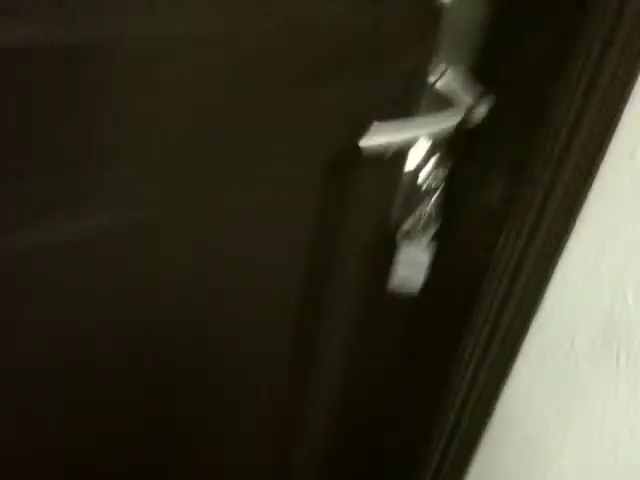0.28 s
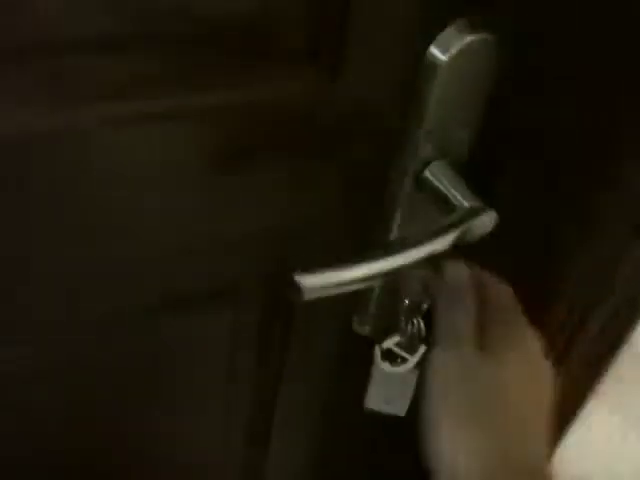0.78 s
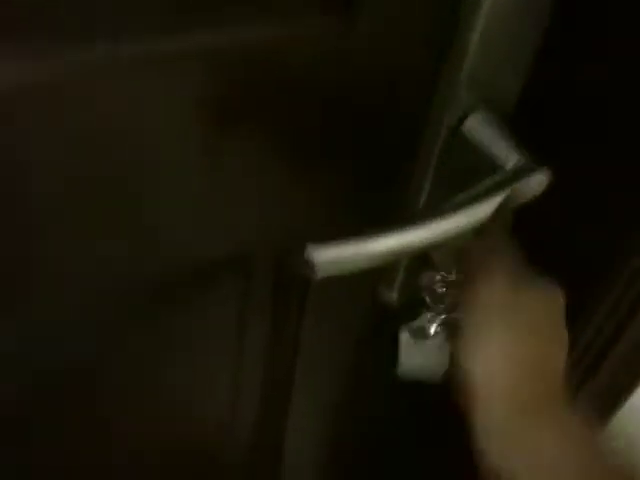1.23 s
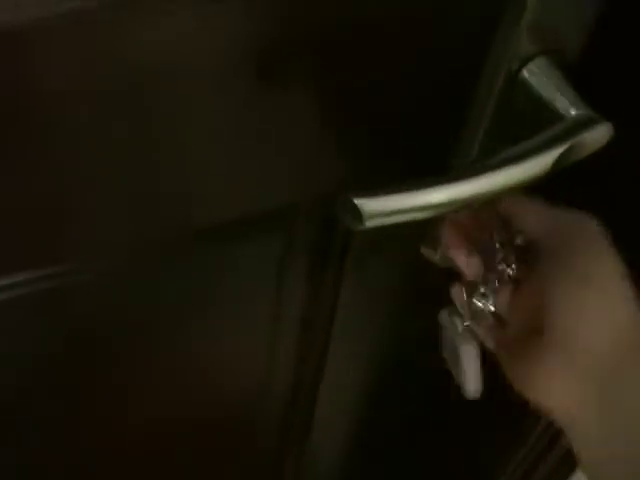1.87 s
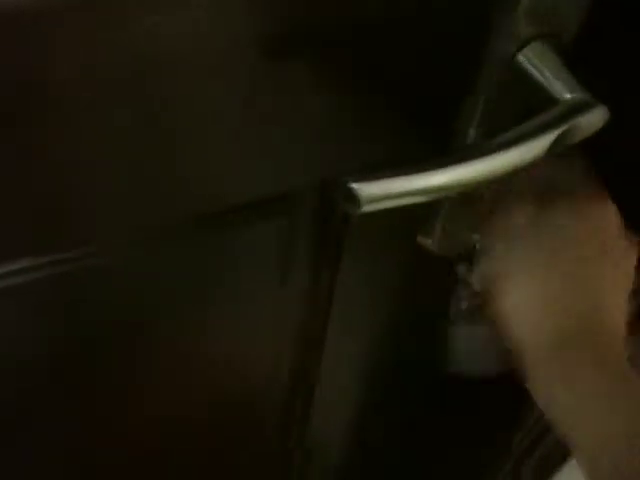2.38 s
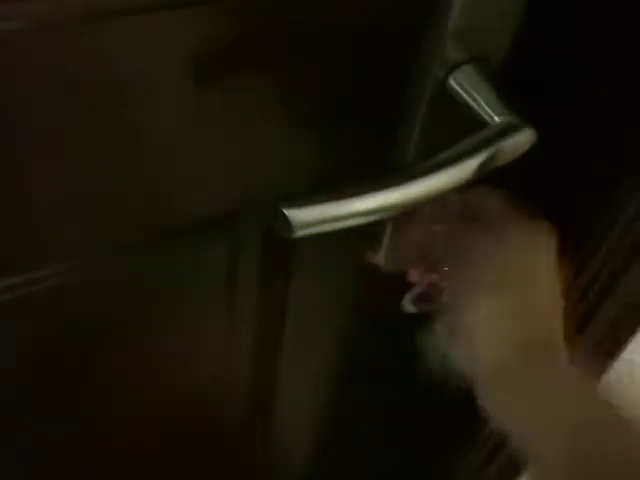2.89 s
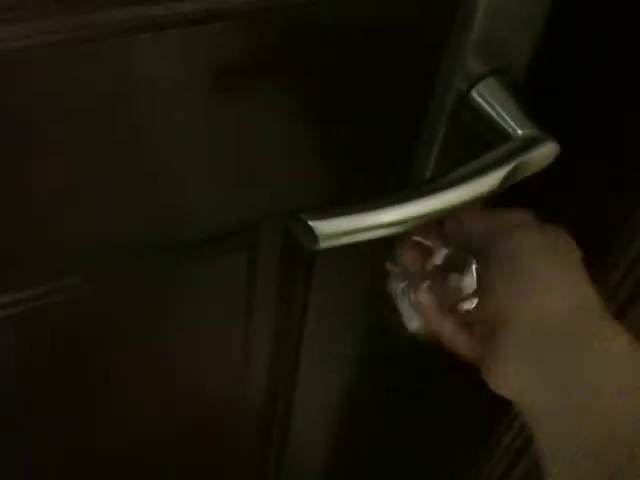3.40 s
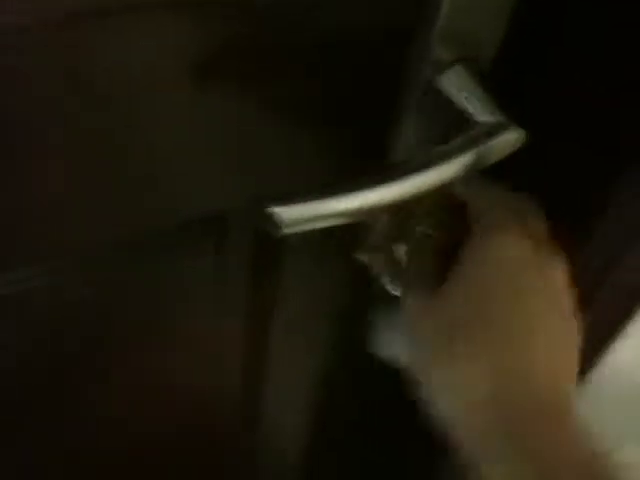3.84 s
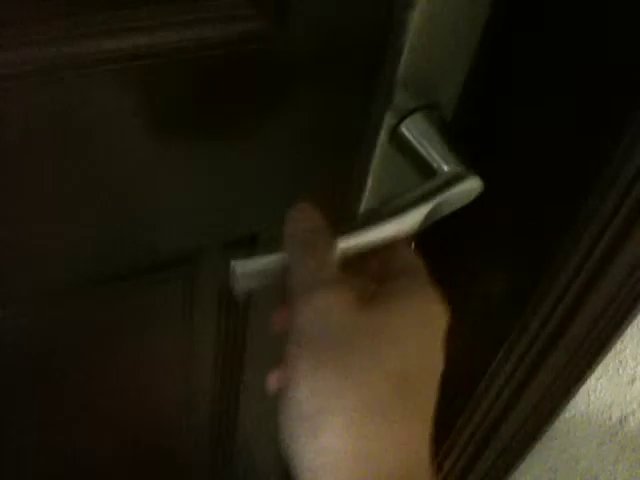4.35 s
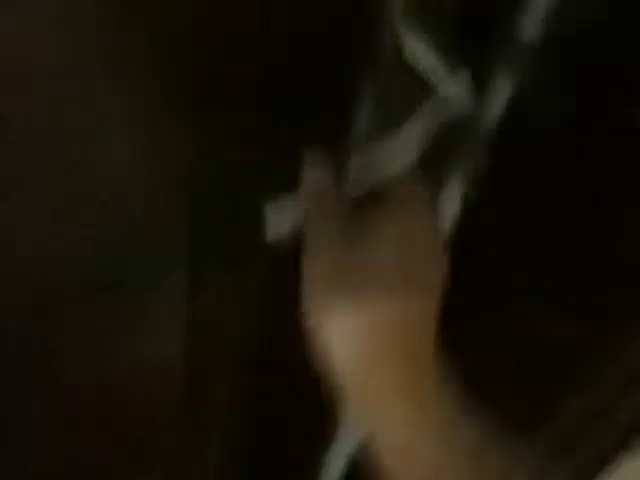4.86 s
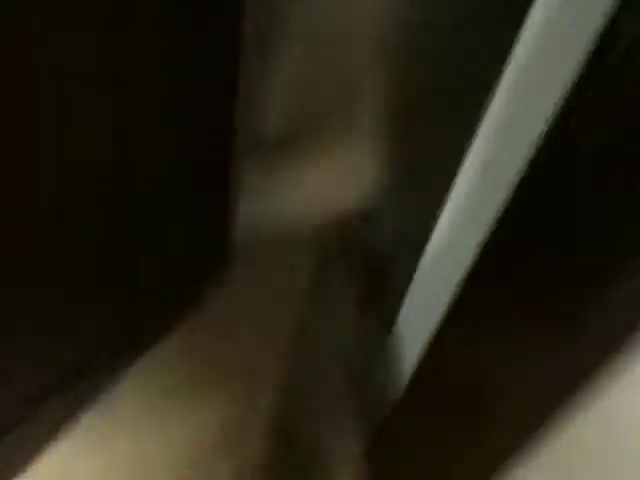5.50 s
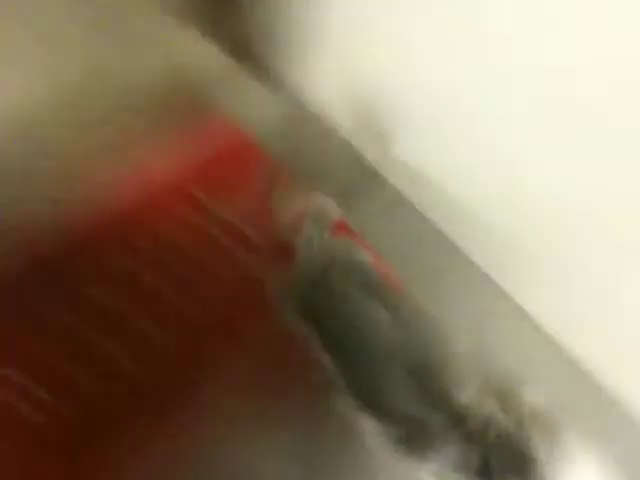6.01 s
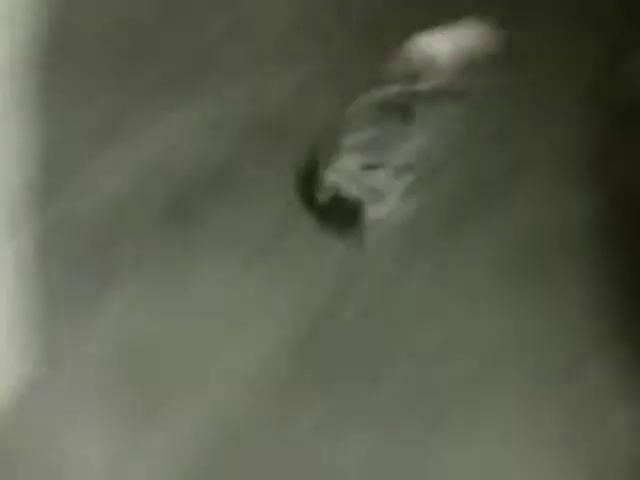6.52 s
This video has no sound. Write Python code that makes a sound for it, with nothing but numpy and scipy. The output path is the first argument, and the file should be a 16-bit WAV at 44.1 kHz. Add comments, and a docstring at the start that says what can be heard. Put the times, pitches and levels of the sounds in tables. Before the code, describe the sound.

Soft steps and a little rustling open the first half second over faint, still room air. Around 1 second a key clicks into a door lock close by, with a dull knock on the wooden door. The key scrapes and ticks, then turns with a loud steel clack at about 2.1 seconds. Small rattles and the tinkle of hanging keys continue until a second turn shoots the bolt back at 3.5 seconds, ringing briefly and thumping through the door. Near 4 seconds the key comes out with a sharp snap and a bright jingle. The lever handle clunks at 4.5 seconds with faint squeaks, and the latch rattles at about 5.2 as the door opens. Light knocks and rustles follow, with soft low bumps on the hand-held microphone just after 6 seconds. The hard walls of a garage ring after each click.

```python
"""Soft steps and a knock, then close by a key turns twice in a door lock, the bolt shoots back, the
lever is pressed and the door opens on a garage. Steel parts snap and rattle in the lock case, the
wooden door carries the blows, the hanging keys tinkle. A hard-walled room rings after each click.
The microphone rides on a hand-held camera, which is bumped as it is carried through."""
import sys
import numpy as np
from scipy import signal
from scipy.fft import rfft, irfft
from scipy.io import wavfile
from scipy.ndimage import uniform_filter1d

SR = 44100
rng = np.random.default_rng(int(sys.argv[2]) if len(sys.argv) > 2 else 0)


def wav_record(signal):
    """Record a signal, one row per channel, as 16-bit PCM in the file named by sys.argv[1]."""
    frames = np.transpose(np.atleast_2d(signal))
    bounded = np.clip(frames, -1, 1)
    # unit amplitude maps onto the largest positive 16-bit level
    quanta = np.round(bounded * 32767).astype(np.int16)
    wavfile.write(sys.argv[1], SR, quanta)


N = 297016
TIME = np.arange(N) / SR
BANDS_HZ, TOP_HZ = 62.5 * 2 ** np.arange(9), 16000

# steel blows: key in from 1 s, turns at 2.1 and 3.5 s, key out near 4 s, lever and latch from 4.5 s
# (time [s], strength [dB], bass from the door [dB], treble slope [dB/octave], t60 at 4 kHz [s])
LOCK_BLOWS = [ (0.987, -11, -0.5, -4.5, 0.058), (1.297, -27.5, -2, 2, 0.11), (1.348, -19.5, 0.5, -4, 0.11),
              (1.483, -3.5, 9, 4, 0.037), (1.59, -25.5, 17, 2.5, 0.052), (1.654, -20, 14, 0, 0.11),
              (1.7, -8, 6, -1.5, 0.11), (1.789, -26, 1, 1, .06), (1.869, -27, 6.5, -1, 0.075),
              (1.989, -36, -1, 3, 0.052), (2.081, 4, -4, -7.5, 0.084), (2.112, -2, 5, -3.5, 0.2),
              (2.13, 7.5, -5, 0.5, 0.091), (2.137, 12.5, -0.5, -1, 0.041), (2.144, 4.5, -1.5, -1, 0.043),
              (2.304, 1, -0.5, 0.5, 0.045), (2.334, -8.5, -10, 0, 0.053), (2.382, -14.5, -11, 0, 0.04),
              (2.435, -32.5, -5, 5.5, 0.031), (2.489, -11, -8, -1.5, 0.24), (2.556, -19.5, 17, 3.5, 0.059),
              (2.605, -33.5, 3.5, 4, 0.02), (2.627, -20.5, -15.5, 9.5, 0.043),
              (2.692, -24, -8.5, 1.5, 0.023), (2.754, -24.5, 16, 4.5, 0.055), (2.772, -29.5, 3, 4, 0.034),
              (2.814, -30.5, -1.5, 3.5, 0.042), (2.841, -33.5, 1.5, 10, 0.16), (2.859, -22.5, 21, 1.5, .05),
              (2.9402, -6.5, -10, 1.5, 0.034), (3.014, -19, -5, -2.5, 0.069),
              (3.038, -20.5, 17, 4.5, 0.086), (3.124, -17, 11.5, 1, 0.16), (3.185, -21, -3.5, -2, 0.12),
              (3.2065, -37, -3.5, 9.5, 0.034), (3.238, -19.5, 8, 2, 0.088), (3.246, -18, 13.5, 4.5, 0.051),
              (3.2704, -14.5, 0.5, 1, 0.042), (3.279, -13.5, 1.5, -2, 0.045), (3.287, -13, 3, -1, 0.034),
              (3.333, -9.5, 2.5, -3, 0.046), (3.443, -11.5, -5, 4, 0.059), (3.475, -11, 6, 0.5, 0.17),
              (3.507, 0, 5, -9, 0.17), (3.527, 3, -2.5, 2.5, 0.041), (3.533, 12.5, -7.5, -2.5, 0.053),
              (3.5376, 12, -4.5, -7.5, 0.034), (3.7733, -3.5, 4, 6.5, 0.032),
              (3.9665, -3.5, -9.5, 6.5, 0.021), (3.9675, 14.5, -4, -9, 0.075), (4.052, -4, 1.5, 3, 0.032),
              (4.098, -2, -13, 1, 0.064), (4.181, 7.5, -21, -7, 0.053), (4.277, -21.5, -17, 7, 0.2),
              (4.5262, -1.5, -2, -2, .14), (4.557, -4, -3, 0.5, 0.1), (5.14, -6, -8, -4, 0.044),
              (5.154, -7, -3, -5.5, 0.033), (5.162, -8.5, -3, -5, 0.039), (5.1853, -4, -2.5, -2, 0.033),
              (5.193, -7, -1, -5, 0.045)]


def undb(db):
    """Decibels to gain."""
    return 10 ** (np.asarray(db) / 20)


def unit(x):
    """Scale to rms 1."""
    return x / np.sqrt(np.mean(x ** 2))


def fade(t, t60):
    """Free decay, 60 dB down after t60."""
    return np.exp(-np.log(1000) * t / t60)


def add(out, start_s, x):
    """Mix x into out from start_s on."""
    i = max(int(start_s * SR), 0)
    out[i:i + len(x)] += x[:max(N - i, 0)]


def wander(shape, samples):
    """Random drift of rms 1, smoothed over so many samples."""
    return unit(uniform_filter1d(rng.standard_normal(shape), size=samples))


def colour(x, points):
    """Shape the spectrum of x by points of (frequency [Hz], gain [dB])."""
    hz, db = np.transpose(points)
    freqs = np.maximum(np.fft.rfftfreq(len(x), 1 / SR), 1)
    return irfft(rfft(x) * undb(np.interp(np.log(freqs), np.log(hz), db)), len(x))


def octaves(x):
    """Split x into overlapping octave bands that sum to x."""
    pitch = np.log(np.maximum(np.fft.rfftfreq(len(x), 1 / SR), 1))
    masks = np.array([np.interp(pitch, np.log(BANDS_HZ), band) for band in np.eye(len(BANDS_HZ))])
    return irfft(rfft(x) * masks, len(x))


def by_band(hz, values):
    """A short spectrum read at the octave bands, as a column."""
    return np.interp(np.log(BANDS_HZ), np.log(hz), values)[:, None]


def blows(hits, spectrum, snap, bass_hold, drag_s, crack_t60=0.0064):
    """Each blow is a bright crack and a dense clatter that dies faster in the treble."""
    out, t = np.zeros(N), TIME[:3 * 2 ** 11]
    treble_octaves = np.log2(np.maximum(BANDS_HZ / 2000, 1))[:, None]
    bass_share = by_band([400, 2000], [1, 0])
    material_db = by_band(*np.transpose(spectrum))
    crack = 1 + snap * BANDS_HZ[:, None] / TOP_HZ * fade(t, crack_t60)
    for start, db, bass_db, slope, t60 in hits:
        # short contacts start at once, long dragging ones swell
        swell = 1 - np.exp(-t / (drag_s * (t60 / 0.13) ** 2))
        envelope = swell * crack * fade(t, t60 * (BANDS_HZ[:, None] / 4000) ** -bass_hold)
        envelope /= np.sqrt(np.sum(envelope ** 2, axis=1, keepdims=True))
        gain = undb(db + material_db + bass_db * bass_share + slope * treble_octaves)
        add(out, start, np.sum(gain * envelope * octaves(rng.standard_normal(len(t))), axis=0))
    return out


def room_tone(level_db=-64.5):
    """The still air of the house: a faint, steady noise, strongest in the bass."""
    # spectrum of the air (frequency [Hz], relative density [dB])
    spectrum = [(15, -78), (25, -58), (53, -56), (70, -3), (108, -14.5), (123, 0), (185, -3), (229, -10),
                (285, -4.5), (373, -14.5), (840, -17.5), (1260, -22), (3000, -27.5), (5730, -27),
                (7200, -22.5), (8300, -28.5), (9570, -26.5), (16000, -29)]
    return undb(level_db) * unit(colour(rng.standard_normal(N), spectrum))


def room(x, early_t60=0.43, onset_s=0.00099, drift_hz=0.596, positions=3):
    """Near walls answer quickly, the bare garage rings on; the echoes shift as the microphone moves."""
    # reverberation (frequency [Hz], early reflections [dB], late tail [dB], late t60 [s])
    reverberation = [(60, -6.5, -1.5, 0.73), (143, -3.5, 0, 2.5), (377, -3.5, -11.5, 1),
                     (1000, -7, -14, 1.57), (2630, -13.5, -9.5, 0.8), (5990, -14, -17, 0.98),
                     (14460, -13.5, -24.5, 0.48)]
    t = TIME[:2 ** 16]
    hz, *columns = np.transpose(reverberation)
    early_db, late_db, late_t60 = (by_band(hz, column) for column in columns)
    power = 0
    for db, t60 in ((early_db, early_t60), (late_db, late_t60)):
        envelope = fade(t, t60) * (1 - np.exp(-(t / onset_s) ** 2))
        power = power + (undb(db) * envelope) ** 2 / np.sum(envelope ** 2, axis=-1, keepdims=True)
    out = np.zeros(N)
    for position in range(positions):
        response = np.sum(np.sqrt(power) * octaves(rng.standard_normal(len(t))), axis=0)
        blend = np.sqrt(2 / positions) * np.cos(np.pi * (drift_hz * TIME + position / positions))
        out += blend * signal.fftconvolve(x, response)[:N]
    return out


def handling_bumps(push_s=0.019, decay_cycles=6, rise_s=0.0029, scatter_db=4.0, uneven=0.374):
    """Fingers stick and slip on the camera body, right at the microphone: runs of soft, low pushes."""
    # shifts of grip (time [s], length [s], level before scatter [dB], pitch [Hz])
    shifts = [(6.037, 0.035, -44.5, 147), (6.105, 0.01, -31.5, 255), (6.114, 0.16, -38.5, 167)]
    out, t = np.zeros(N), TIME[:SR // 8]
    for start, length, db, hz in shifts:
        thud = np.sin(2 * np.pi * hz * t) * fade(t, decay_cycles / hz) * (1 - np.exp(-t / rise_s))
        thud /= np.abs(thud).max()
        for lag, (late, size) in zip(np.arange(0, length, push_s), rng.uniform(-1.16, 1, (20, 2))):
            add(out, start + lag + uneven * late * min(lag, push_s), undb(db + scatter_db * size) * thud)
    return out


def knocks():
    """Steps, a soft knock on the door and things brushed in passing: blows with a wooden colour."""
    # (time [s], strength [dB], bass [dB], treble slope [dB/octave], t60 at 4 kHz [s])
    hits = [(0.02, -25, 3, -9, 0.79), (0.073, -23, 10, -0.5, 0.12), (0.166, -9, 3, -9.5, 0.24),
            (0.481, -17.5, 7, -8, 0.21), (1.1318, -15, 11, -12, 0.073), (1.146, -11.5, 3, -13.5, 0.11),
            (1.157, -20, 5, -9, .05), (5.51, -37, -2, 1, 0.025), (5.614, -36.5, -6, 4.5, 0.045),
            (5.6705, -34, 10.5, 4.5, 0.055), (5.739, -15, 5, -5, 0.13), (5.8, -16.5, 1, -1.5, 0.13),
            (5.831, -15.5, -5, -5.5, 0.076), (5.9575, -14.5, -9, -9.5, 0.067), (6.0125, -14, -3, -3, 0.33),
            (6.0965, -29.5, 16, 4, 0.044), (6.178, -19, 9.5, -17, 0.21), (5.912, -19.5, 0, -11, 0.084),
            (6.22, -36.5, -4, 4, 0.12), (6.33, -33, 1, 5, 0.081), (6.39, -35, -0.5, 2.5, .03),
            (6.613, -36, 4, 2.5, 0.057)]
    # colour of wood (frequency [Hz], gain [dB])
    wood = [(70, -23), (400, -1.5), (2000, -3), (4000, -1), (10000, 3), (16000, -1)]
    return blows(hits, wood, snap=0.93, bass_hold=0.089, drag_s=0.00063)


def rubbing_pressure(rise_db_per_s=208.5, stop_s=0.0051):
    """The force behind each slide and rustle, as (envelope, body [dB], hiss [dB])."""
    # the bolt slides, pressed ever harder until stopped (stop [s], relative body [dB], relative hiss [dB])
    slides = [(2.135, -64, -72), (3.531, -42, -55), (3.968, -41.5, -45.5)]
    # fingers, keys and cloth rub (middle [s], length [s], relative body [dB], relative hiss [dB])
    rustles = [(0.01, 0.17, -53, -56), (1.381, 0.2, -61.5, -59.5), (1.614, 0.29, -58, -54),
               (2.533, 0.45, -61, -57.5), (2.855, 0.61, -57, -79), (3.348, 0.36, -54.5, -56),
               (3.883, 0.2, -70, -55), (3.925, 0.056, -56, -42.5), (4.078, 0.33, -57, -45.5),
               (4.287, 0.22, -61.5, -58.5), (5.156, 0.26, -59.5, -54.5), (5.218, 0.14, -52, -57),
               (5.4, 0.66, -69, -59), (5.798, 0.25, -66, -57.5), (6.024, 0.4, -68, -59),
               (6.43, 0.59, -64.5, -55)]
    for stop, body_db, hiss_db in slides:
        rise = undb(-rise_db_per_s * np.abs(stop - TIME))
        yield rise * np.clip((stop - TIME) / stop_s, 0, 1), body_db, hiss_db
    for middle, length, body_db, hiss_db in rustles:
        yield np.cos(np.pi * np.clip((TIME - middle) / length, -.5, .5)), body_db, hiss_db


def rubbing(catches_per_s=700, scatter_db=2, grain_t60=0.012, smooth=0.67, grip_s=0.022, grip_db=4.5):
    """Surfaces slide in tiny catches, each a burst of grit; the grip tightens and slackens unevenly."""
    # low body and high hiss of the friction, both (frequency [Hz], relative density [dB])
    body_spectrum = [(120, -37.5), (200, 2.5), (370, -14), (435, 2), (970, -10.5), (1160, -8.5), (1400, -6),
                     (1710, -8), (2780, -16), (4000, -10), (5200, -45), (8800, -120)]
    hiss_spectrum = [(1760, -26.5), (3000, -11.5), (4380, -10), (6530, -4), (8640, -8.5), (9800, -7),
                     (14400, -17), (16000, -8.5)]
    catches = rng.random(N) < catches_per_s / SR
    sizes = undb(scatter_db * np.minimum(rng.exponential(size=N), 3))
    grit = smooth + unit(signal.fftconvolve(catches * sizes, fade(TIME[:SR // 20], grain_t60))[:N])
    grip_times = np.arange(0, N / SR, grip_s)
    grit *= undb(grip_db * np.interp(TIME, grip_times, rng.uniform(-1.2, 1, len(grip_times))))
    body = unit(lock_case(colour(grit * rng.standard_normal(N), body_spectrum), direct_db=1.5))
    hiss = unit(colour(grit * rng.standard_normal(N), hiss_spectrum))
    return sum(envelope * (body * undb(body_db) + hiss * undb(hiss_db))
               for envelope, body_db, hiss_db in rubbing_pressure())


def rasps(ticks_per_s=1500, broad_db=-45.5, db_per_doubling=15.5):
    """Short rasps: a train of tiny ticks through one resonance, broader for a louder rasp."""
    # brief rasps, one leading into the click at 2.08 s (time [s], length [s], level [dB], pitch [Hz])
    bursts = [(0.163, 0.013, -44, 1840), (1.633, 0.051, -49, 1000), (2.076, 0.016, -36.5, 2700),
              (2.127, 0.0045, -36, 3000), (2.562, 0.055, -67, 700), (2.735, 0.07, -55.5, 1224),
              (2.817, 0.073, -50.5, 1000), (3.036, 0.036, -63, 600), (3.26, 0.041, -50, 3400),
              (3.28, 0.024, -48, 1780), (3.472, 0.044, -44.5, 1070), (3.916, 0.041, -52, 2280),
              (5.123, 0.045, -48.5, 1580), (5.823, 0.027, -52, 1600), (6.174, 0.031, -65, 1900),
              (6.331, 0.27, -63.5, 2130)]
    out = np.zeros(N)
    for start, length, db, hz in bursts:
        width_hz = hz * min(2 ** ((db - broad_db) / db_per_doubling), 2)
        ticks = (rng.random(SR // 2) < ticks_per_s / SR) * rng.standard_normal(SR // 2)
        b, a = signal.iirpeak(hz, hz / width_hz, fs=SR)
        rasp = unit(signal.lfilter(b, a, signal.lfilter(b, a, ticks))[:int(length * SR)])
        add(out, start, undb(db) * signal.windows.tukey(len(rasp), .7) * rasp)
    return out


def squeaks(wobble=0.024):
    """Stick-slip of steel on steel: a few unsteady harmonics."""
    # metal drags (time [s], length [s], pitch [Hz], level [dB], overtones against the fundamental [dB])
    drags = [(3.319, 0.12, 708, -54.5, -1.5), (4.419, 0.084, 2100, -59.5, -29),
             (4.828, 0.059, 2100, -65, -23)]
    out = np.zeros(N)
    for start, length, hz, db, overtone_db in drags:
        drift = wander(SR // 2, samples=150)[:int(length * SR)]
        phase = 2 * np.pi * np.cumsum(hz * (1 + wobble * drift)) / SR
        tone = np.sin(phase) + undb(overtone_db) * (np.sin(2 * phase) + np.sin(4 * phase))
        add(out, start, undb(db) * signal.windows.tukey(len(phase)) * tone)
    return out


def jostles(touches_per_s=35):
    """The bunch jostles in the fingers: light touches at random moments, as rows for keys()."""
    # spells of jostling (start [s], end [s], greatest strength [dB])
    spells = [(1.03, 1.13, -67), (1.3, 1.47, -59), (2.391, 2.87, -56), (3.01, 3.34, -57),
              (3.964, 4.15, -47), (4.15, 4.34, -58), (5.149, 5.5, -61.5)]
    touches = []
    for start, end, db in spells:
        for when, softness, brightness in rng.random((round(touches_per_s * (end - start)), 3)):
            touches.append((start + when * (end - start), db - 10 * softness, 7000 + 8000 * brightness, .4))
    return touches


def keys(contacts=3, bounce_s=0.014, bounce_db=-11, scatter_db=1.0, graze=0.46, clash_t60=0.0076):
    """Thin steel keys click together, rebound and ring; the point of contact picks the modes."""
    # modes of the hanging keys (frequency [Hz], relative level [dB], t60 [s])
    modes = [(5766, -15, .95), (6455, -6, .16), (7154, 0, .2), (7480, -6, .15), (7896, -14, .15),
             (8301, -3, .42), (8980, -8, .33), (9270, -10, .2), (9733, -10, .16), (9900, -12, .4),
             (10410, -9, .1), (10660, -5, .16), (11110, -5, .13), (11580, -10, .1), (11790, -5, .13),
             (12870, -11, .1), (13355, -10, .11), (15470, 0, .22)]
    # keys touching (time [s], strength [dB], brightest frequency [Hz], spread [octaves])
    tinkles = [(1.036, -66.5, 10000, 0.036), (1.065, -60, 10100, 0.054), (1.298, -57, 15400, 0.27),
               (1.349, -56, 11000, 0.34), (1.38, -54, 12100, 0.25), (1.423, -55, 11000, .15),
               (2.392, -47, 15400, 0.33), (2.487, -52, 11900, 0.2), (2.628, -45, 15200, 0.14),
               (2.67, -60, 7100, 0.04), (2.755, -50, 11000, 0.068), (3.037, -43.5, 12600, 0.16),
               (3.966, -29.5, 11200, 0.32), (3.972, -39.5, 7154, .06), (4.052, -39, 15300, 0.14),
               (4.098, -48, 14100, 0.23), (4.182, -55, 5766, .04), (4.277, -50, 6800, .3),
               (4.4295, -40, 7100, 0.09), (4.4296, -46, 8301, .04), (4.4297, -45, 11900, 0.3),
               (4.555, -55, 13200, 0.26), (4.64, -57, 15400, 0.096), (4.801, -43.5, 10700, 0.032),
               (4.803, -51, 7500, 0.14), (4.842, -59.5, 7370, 0.29), (5.053, -58, 15500, 0.25),
               (5.153, -46.5, 9060, 0.03), (5.187, -46, 14900, 0.12), (5.383, -47, 7500, 0.022),
               (5.41, -57, 7200, 0.032), (5.95, -60, 7500, 0.027), (6.012, -54, 7400, .02),
               (6.328, -54, 7500, 0.02)]
    # the click of steel on steel (frequency [Hz], relative density [dB])
    clash_spectrum = [(1500, -30), (4000, -7.5), (7000, -0.5), (12000, -2.5), (16000, -1)]
    stray_db, top_mode_db, clash_db = -31, -13, 6
    hz, db, t60 = np.transpose(modes)
    kicks, impacts = np.zeros((len(modes), N)), np.zeros(N)
    for when, level_db, centre_hz, spread in list(tinkles) + jostles():
        # wherever a key is touched, all its modes sound a little, and the highest gets an extra share
        picked = undb(db) * (np.exp(-.5 * (np.log2(hz / centre_hz) / spread) ** 2) + undb(stray_db))
        reach = picked / np.linalg.norm(picked) + undb(top_mode_db) * (hz == hz.max())
        for bounce in range(contacts):
            size, swing = rng.standard_normal((2, len(modes)))
            weight = reach * undb(scatter_db * size) * np.sign(swing)
            force = undb(level_db + bounce * bounce_db)
            kicks[:, int(when * SR)] += force * weight / np.linalg.norm(weight)
            impacts[int(when * SR)] += force * spread
            when += bounce_s * (.5 + rng.random())
    click_envelope = signal.lfilter([1], [1, -fade(1 / SR, clash_t60)], impacts + 1e-18)
    out = undb(clash_db) * click_envelope * unit(colour(rng.standard_normal(N), clash_spectrum))
    for kick, angle, radius in zip(kicks, 2 * np.pi * hz / SR, fade(1 / SR, t60)):
        ring = signal.lfilter([np.sin(angle)], [1, -2 * radius * np.cos(angle), radius ** 2], kick + 1e-18)
        # neighbouring keys graze the ringing one and make it flutter
        out += (1 + graze * wander(N, samples=250)) * ring
    return out


def door(shudder=0.45, firm_db=-6, shake_db=-49.5, shake_share=0.32, shake_hz=260):
    """The wooden leaf booms and shudders in its frame; a soft jolt reaches only the lowest modes."""
    # bending modes of the leaf (frequency [Hz], relative level [dB], t60 [s])
    modes = [(105, -14, .12), (140, -7.5, 0.3), (153.7, 0, 0.18), (186, 2, 0.085), (255, 9, .03),
             (323, 12, 0.035), (404, 8.5, 0.02), (657, 19.5, 0.02), (813, 23, 0.025), (1050, 14, 0.012),
             (1364, 26.5, .02), (1600, 24.5, .016)]
    # the leaf shifts in its frame (time [s], strength [dB], hardness as a cutoff [Hz])
    jolts = [(1.1316, -28, 884), (2.139, -43, 300), (3.447, -37.5, 220), (3.485, -46.5, 149.6),
             (3.533, -39.5, 240), (3.774, -37, 520), (3.912, -43, 170), (3.967, -38, 280),
             (4.527, -47, 200)]
    # firm blows in the lock pass into the leaf
    shakes = [(start, shake_db + shake_share * db, shake_hz) for start, db, *_ in LOCK_BLOWS if db > firm_db]
    out, t = np.zeros(N), TIME[:SR // 2]
    hz, db, t60 = np.transpose(modes)[:, :, None]
    side = (-1) ** np.arange(len(modes))[:, None]  # successive modes swing opposite ways at the lock edge
    for start, level_db, cutoff_hz in list(jolts) + shakes:
        weight = undb(db) / (1 + (hz / cutoff_hz) ** 2) ** 2
        tremble = 1 + shudder * wander((len(modes), len(t)), samples=700)
        boom = np.sum(side * weight * tremble * np.sin(2 * np.pi * hz * t) * fade(t, t60), axis=0)
        add(out, start, undb(level_db) * boom / np.linalg.norm(weight))
    return out


def ringing_parts():
    """Latch, bolt, lever spring and door fittings each sing briefly at their own pitch when struck; one key
    adds a high ping at 5.155 s."""
    # struck parts (time [s], pitch [Hz], level [dB], t60 [s])
    parts = [(0.167, 1845, -53, 0.21), (2.138, 2376, -29.5, 0.093), (2.138, 976, -34, .07),
             (2.138, 1230, -34, 0.066), (2.139, 3080, -41, 0.035), (2.939, 3730, -25.5, 0.0096),
             (3.533, 1317, -34, 0.39), (3.533, 1420, -39, .36), (3.533, 657, -45.5, 0.23),
             (3.534, 1894, -35, .14), (3.534, 2320, -38, 0.2), (3.773, 3680, -17.5, 0.0068),
             (3.9667, 3037, -14, 0.041), (3.9667, 2624, -18.5, 0.031), (3.967, 2130, -21.5, 0.04),
             (3.968, 664, -42.5, .15), (3.968, 1560, -42, .2), (4.1815, 4860, -24, 0.021),
             (4.1815, 2990, -27, 0.019), (4.526, 2694, -30.5, 0.061), (4.532, 2810, -32.5, 0.02),
             (5.155, 9100, -29.5, .04)]
    out, t = np.zeros(N), TIME[:SR // 2]
    for start, hz, db, t60 in parts:
        add(out, start, undb(db) * np.sin(2 * np.pi * hz * t) * fade(t, t60))
    return out


def lock_case(x, direct_db):
    """The lock case and its plates add their resonances to the sound that passes through them."""
    # resonances of the case (frequency [Hz], width [Hz], gain [dB])
    resonances = [(302, 18, 6), (356, 6.5, 5.5), (662, 89, -7), (853, 75, 0.5), (963, 71, 2),
                  (1254, 57, -5), (1390, 66, 0.5), (1920, 93, -4.5), (2280, 220, -3), (2647, 82, 0),
                  (3045, 110, -2), (3570, 130, -5.5), (5180, 290, -4), (5830, 320, -5.5), (6610, 580, -3),
                  (8040, 50, -5), (9800, 170, -4.5)]
    ringing = sum(undb(db) * signal.lfilter(*signal.iirpeak(hz, hz / width, fs=SR), x)
                  for hz, width, db in resonances)
    return undb(direct_db) * x + ringing


def lock():
    """Key, bolt, latch and lever strike steel on steel inside the lock case."""
    # colour of steel (frequency [Hz], gain [dB])
    steel = [(70, -36), (400, 0.5), (1000, -1), (2000, -0.5), (4000, 1), (8000, -4), (16000, -13.5)]
    return lock_case(blows(LOCK_BLOWS, steel, snap=0.73, bass_hold=0.5, drag_s=0.0012), direct_db=1.0)


def scene():
    """At the door, in mono: all sources ring in the room, but the bumps come through the camera body."""
    strikes = undb(-4) * lock() + undb(1) * knocks() + undb(1.5) * door() + ringing_parts()
    airborne = strikes + undb(2) * keys() + undb(-2) * rubbing() + rasps() + squeaks()
    return (room_tone() + airborne + room(airborne) + handling_bumps())[None]


def record(dry):
    """The small microphone loses the deep bass and softens the top, which is then cut steeply."""
    thin = signal.sosfilt(signal.butter(2, 65, "high", fs=SR, output="sos"), dry)
    soft = signal.sosfilt(signal.butter(2, 14500, "low", fs=SR, output="sos"), thin)
    return signal.sosfilt(signal.ellip(8, .2, 70, TOP_HZ, fs=SR, output="sos"), soft)


dry = scene()
out = record(dry)
wav_record(out)
```